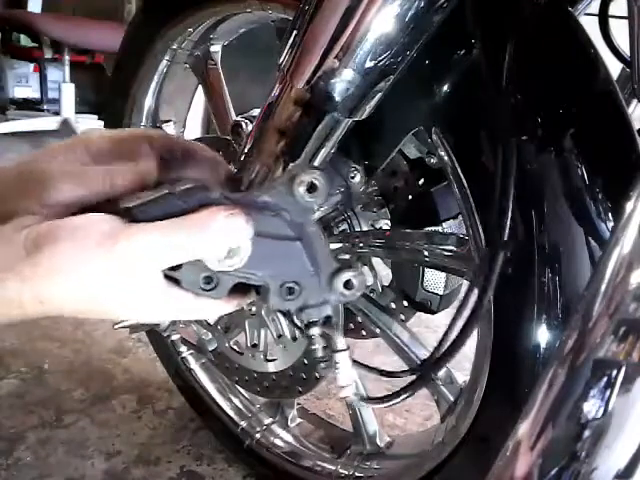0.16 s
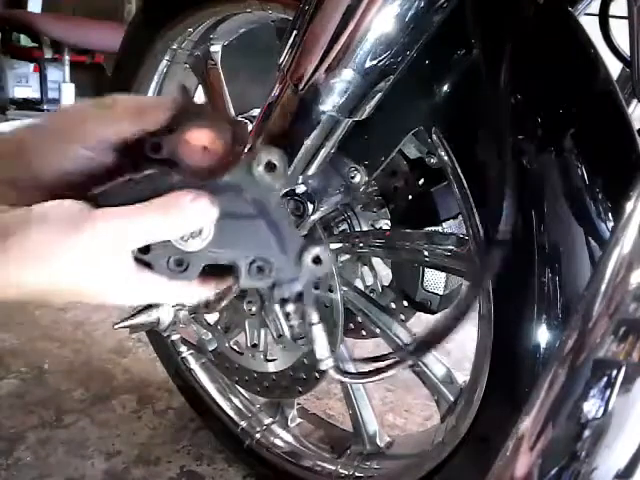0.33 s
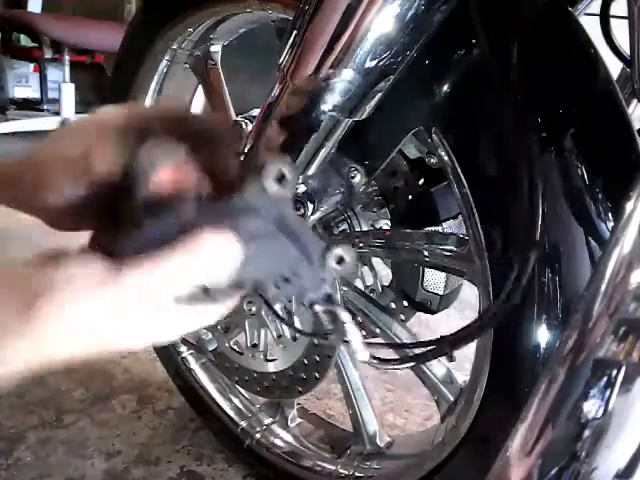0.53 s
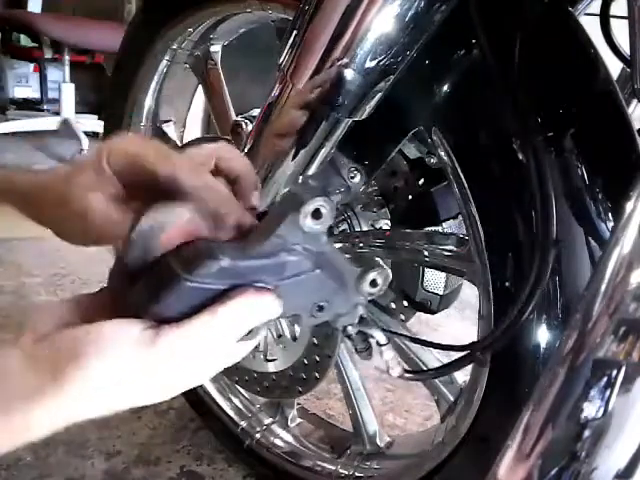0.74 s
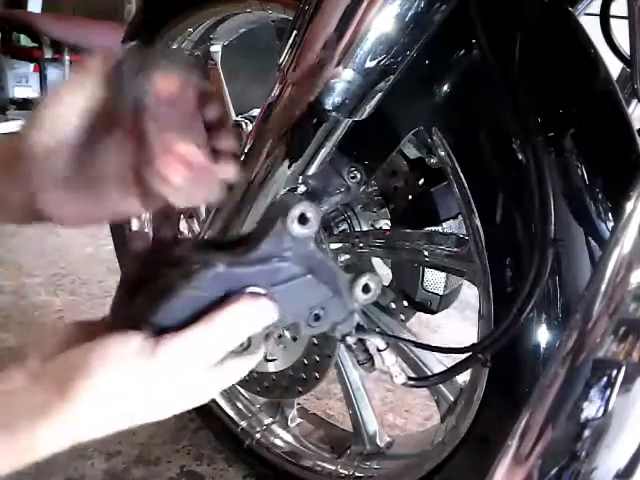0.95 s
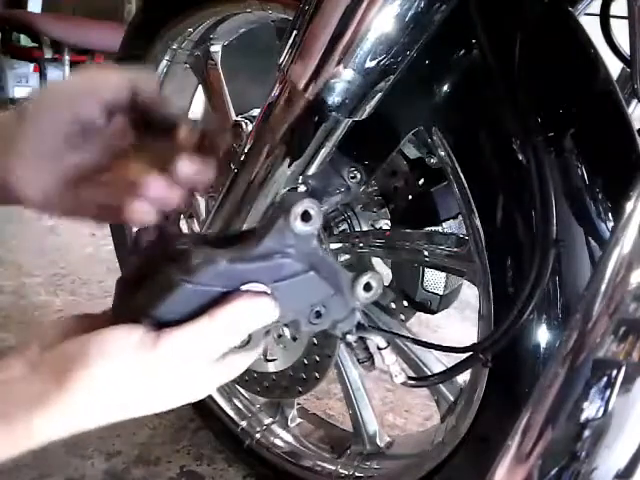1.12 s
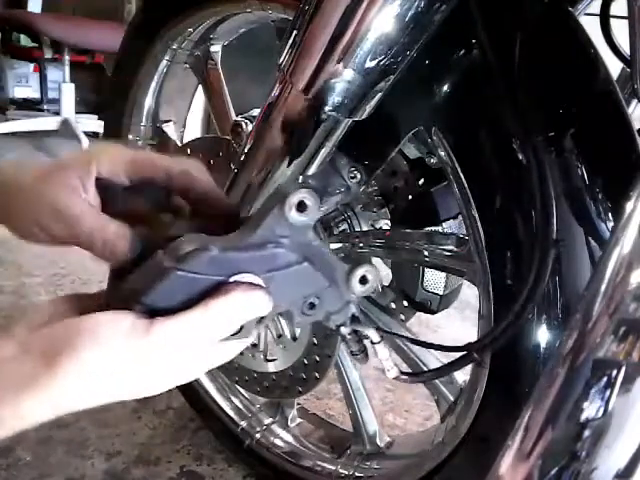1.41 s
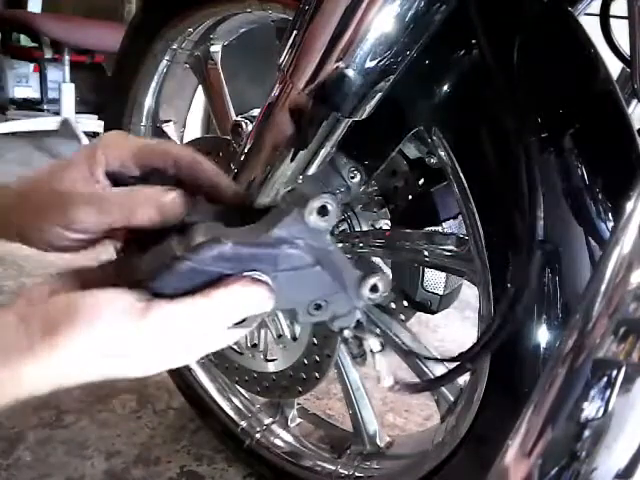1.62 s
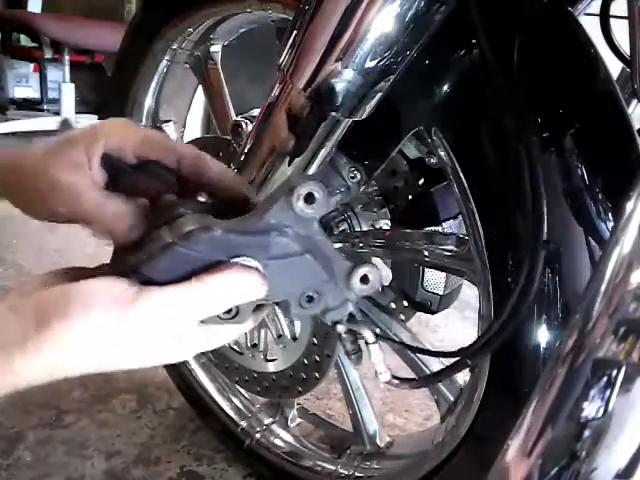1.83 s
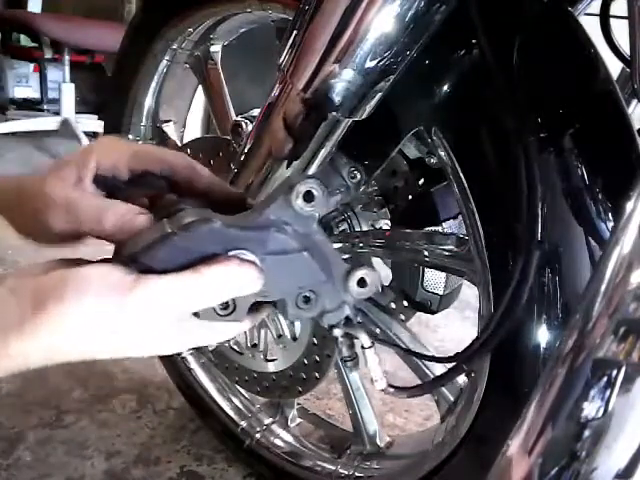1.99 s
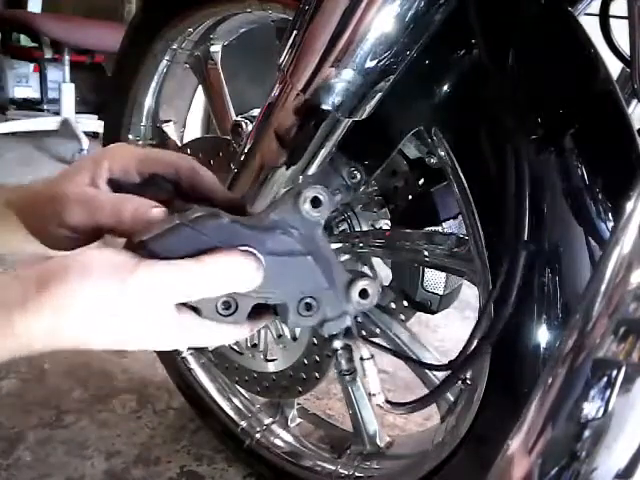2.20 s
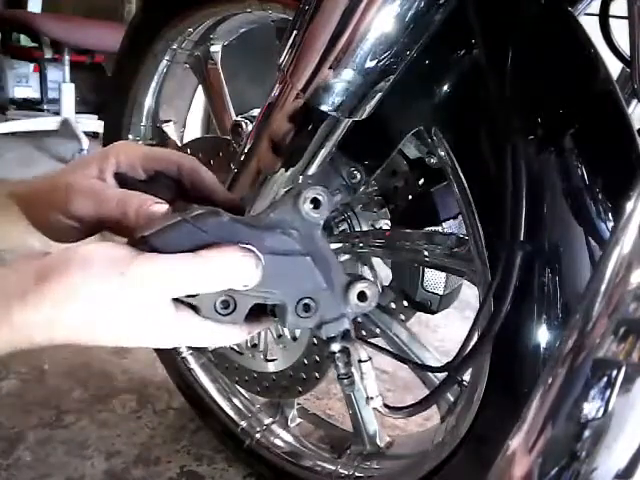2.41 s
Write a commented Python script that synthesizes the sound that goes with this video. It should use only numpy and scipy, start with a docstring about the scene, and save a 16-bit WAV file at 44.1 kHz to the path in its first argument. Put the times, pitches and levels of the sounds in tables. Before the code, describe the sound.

Close up in a garage, hands work brake pads out of a heavy caliper: a hard metallic clack first, ringing clinks within the first second, then quiet rubbing and tiny ticks over low rumble and soft hiss.

```python
"""In a garage, a hand works steel brake pads loose from a cast caliper, an arm's length from a small stereo camera.
The casting clacks and the loose pad rings as decaying modes; the seated pad ticks, with shorter rings, and knocks.
Fingers slip, driving single modes, and scrape as grainy band noise. The garage answers with decaying noise echoes
over a steady rumble with hiss and a few wavering hum tones."""
import sys
import numpy as np
from scipy import signal
from scipy.fft import rfft, irfft, next_fast_len
from scipy.io import wavfile
from scipy.ndimage import uniform_filter1d

SR = 44100
rng = np.random.default_rng(int(sys.argv[2]) if len(sys.argv) > 2 else 0)


def wrap_up_sound(samples):
    """Save the sound to the file named by the first command line argument, as 16-bit audio."""
    columns = np.atleast_2d(samples).T
    # keep every value between -1 and 1, then stretch to whole-number steps
    tamed = np.clip(columns, -1, 1)
    steps = np.round(tamed * 32767).astype(np.int16)
    wavfile.write(sys.argv[1], SR, steps)


def boost_factor(decibels):
    """Convert a level in decibels to a linear amplitude factor."""
    exponent = np.asarray(decibels, float) / 20
    return 10 ** exponent


N = 112454

# Metal against the casting. Each row: start in seconds, ring level in dB before tilt and mode levels,
# crack level in dB before its envelope, crack tilt in dB per octave, crack upper corner in hertz, crack t60 in seconds.
CLACK_EVENTS = [(0.198, -46, -38, -2, 6030, 0.096), (0.2071, -29, -13.5, 0, 9100, 0.034),
                (.208, -5, -15.5, 2.5, 14000, 0.0082), (0.211, -11.5, -13, 4, 15500, 0.035),
                (0.215, -16.5, -25, 0, 14100, 0.023), (.219, -18.5, -29, 0.5, 10000, 0.043),
                (0.2228, -23, -26.5, -0.5, 14850, 0.17), (0.2399, -14, -26.5, -3, 9000, .025),
                (0.253, -35, -41, -8, 8030, 0.076), (0.4366, -44, -33.5, -2.5, 8500, 0.02),
                (0.4443, -24.5, -33, -4.5, 5000, 0.011), (0.489, -44, -23.5, 0.5, 8360, 0.017),
                (0.4988, -52, -30, 0, 7100, 0.013), (.505, -51, -31, 6, 7000, 0.032),
                (0.53, -40, -26, -3.5, 9000, 0.012), (.536, -49, -20.5, -2.5, 9500, 0.018),
                (.546, -45, -38, -8.5, 9000, 0.042), (.553, -57, -32, -4.5, 12300, 0.077),
                (.602, -47, -40.5, 3, 6000, 0.019), (0.679, -49, -32.5, -0.5, 5750, 0.016),
                (0.6827, -35, -32.5, -0.5, 8900, 0.068), (0.797, -32, -33.5, -2, 12000, 0.032),
                (.802, -28, -38.5, -8.5, 12800, 0.024), (.898, -56, -38.5, -1.5, 9000, 0.032),
                (0.905, -39, -50, 4, 15090, 0.013), (1.679, -66, -56, -10, 2976, 0.022),
                (2.2215, -49, -64, 0, 6480, 0.022), (2.274, -55, -55.5, -3, 6460, 0.022)]
CONTACT_S = 0.00025  # time constant of the rise at a contact
SCATTER_DB = 2.5  # largest random change of a mode's level, either way
LEFT_RIGHT = np.array([[1], [-1]])  # signs with which a side signal enters the two ports


def along_hz(table, n):
    """Interpolation on a logarithmic frequency axis: a (Hz, value) table read at the bins of an n-point spectrum."""
    hz, values = np.array(table, float).T[:2]
    return np.interp(np.log(np.fft.rfftfreq(n, 1 / SR) + 1), np.log(hz), values)


def colour(x, gain):
    """Linear filtering as a product of spectra: one gain per bin."""
    return irfft(rfft(x) * gain, x.shape[-1])


def unit(x):
    """Normalization to unit root mean square."""
    return x / np.sqrt(np.mean(x ** 2))


def decay(t, t60):
    """Exponential damping: the level falls by 60 dB in t60 seconds."""
    return np.exp(-np.log(1000) * t / t60)


def flutter(db, count, size):
    """Amplitude modulation by smoothed noise: a random gain of db rms, averaged twice over size samples."""
    noise = uniform_filter1d(rng.standard_normal(count), size=size)
    return boost_factor(db * unit(uniform_filter1d(noise, size=size)))


def strike(times, db, hz, t60, scatter_db=0., rattle_db=0.):
    """Impulse excitation of one damped mode: each blow has its own level and ring time."""
    size = 12288
    rattle_onset_s = .02
    db = db + scatter_db * (2 * rng.random(len(times)) - 1)
    out = np.zeros(N + size)
    for start, gain, ring in zip(times, boost_factor(db), np.broadcast_to(t60, len(times))):
        i = int(start * SR) + 1
        t = (np.arange(size) + i) / SR - start  # keeps the timing between samples
        if rattle_db:
            # the flutter grows after the blow
            gain = gain * flutter(rattle_db, count=size, size=220) ** -np.expm1(-t / rattle_onset_s)
        rise = -np.expm1(-t / CONTACT_S)
        out[i:i + size] += gain * np.sin(2 * np.pi * hz * t) * decay(t, ring) * rise
    return out[:N]


def casting_ring():
    """Modal superposition: each clack rings the heavily damped modes of the casting."""
    # Mode frequencies of the casting in hertz.
    mode_hz = [650, 920, 1340, 1445, 1562, 1866, 2294, 2705, 3390, 3560, 4240, 4650, 6070, 7450]
    # Dull modes in the same order. Each row: level in dB before the common cut, t60 in seconds.
    mode_decays = [(-31, 0.04), (-12, 0.04), (-16.5, 0.023), (-2.5, 0.044), (3, 0.034), (-3, 0.045),
                   (-8, 0.034), (-11.5, 0.033), (-10.5, 0.027), (1.5, 0.038), (-11, 0.059), (-13, 0.032),
                   (-14, 0.07), (-18, 0.03)]
    common_db = -9.5
    tilt_share = .5  # share of the crack's tilt that also tilts the ring
    rows = np.array(CLACK_EVENTS)
    out = np.zeros(N)
    for k, (hz, (mode_db, t60)) in enumerate(zip(mode_hz, mode_decays)):
        tilt_db = tilt_share * rows[:, 3] * np.log2(hz / 1500)
        level_db = rows[:, 1] + mode_db + common_db + tilt_db
        out += (-1) ** k * strike(rows[:, 0], level_db, hz, t60, SCATTER_DB)  # signs alternate
    return out


def casting_crack():
    """Broadband contact noise: a scatter of tiny contacts makes each crack; returns mid and side."""
    # Spectrum of a crack. Each row: frequency in hertz, relative level in dB per hertz.
    crack_shape = [(200, -34), (400, -23.5), (660, -24.5), (950, -15.5), (1200, -16.5), (1600, -8.5),
                   (2360, -7.5), (3510, -5), (6050, -14.5), (10500, -31.5), (12500, -32.5), (14700, -31),
                   (15600, -38)]
    size = 8192
    grain_db = 3
    side_db = -9  # part of a crack that differs between the ports
    out = np.zeros((2, N))
    t = np.arange(size) / SR
    hz = np.fft.rfftfreq(size, 1 / SR)
    shape_db = along_hz(crack_shape, size)
    octaves = along_hz([(250, -4), (16000, 2)], size)  # octaves from 4 kHz
    rise = -np.expm1(-t / CONTACT_S)
    for start, _, db, tilt_db, top_hz, t60 in CLACK_EVENTS:
        grain = flutter(grain_db, count=size, size=40)
        spectrum = boost_factor(shape_db + tilt_db * octaves) / (1 + (hz / top_hz) ** 10)
        burst = unit(colour(grain * rng.standard_normal((2, size)), spectrum))
        burst = boost_factor([[db], [db + side_db]]) * burst * decay(t, t60) * rise
        i = int(start * SR)
        out[:, i:i + size] += burst[:, :N - i]
    return out


def ring_pad(modes, hits):
    """Modal excitation by position: the place of a blow sets each mode's level; the grip scales ring times."""
    rows = np.array(hits)
    times, grip = rows[:, 0], rows[:, -1]
    out = np.zeros(N)
    for k, (hz, t60, partner_hz, partner_db, partner_t60) in enumerate(modes):
        db = rows[:, k + 1]
        # a pad shaking in the grip makes each strong mode flutter as it fades
        out += strike(times, db, hz, t60 * grip, rattle_db=6)
        out -= strike(times, db + partner_db, partner_hz, partner_t60 * grip, SCATTER_DB)
    return out


def loose_pad():
    """Lightly damped free plate: four strong modes with partners, and top modes that follow the fourth."""
    # Each row: strong mode in hertz, its t60 in seconds free of the grip, partner in hertz,
    # partner level in dB against the strong mode before scatter, partner t60 in seconds free of the grip.
    loose_modes = [(2345, 0.13, 2200, -3, 0.041), (3218, 0.11, 3620, 0.5, 0.032),
                   (5958, 0.13, 6800, -17, .03), (7500, 0.083, 8080, -4, 0.035)]
    # Highest modes. Each row: frequency in hertz, level in dB against the fourth mode before scatter,
    # t60 in seconds free of the grip.
    top_modes = [(8850, -11, .05), (9880, -12, .055), (11520, -17, .06), (14500, -16, .055)]
    # Blows. Each row: start in seconds, level in dB of each of the four strong modes,
    # ring time as a ratio to that of the free pad (the grip of the hand).
    loose_hits = [(.4365, -51, -66, -52.5, -55.5, 1.4), (0.4889, -50, -39, -36.5, -53, 1.3),
                  (0.4939, -32, -39, -54, -58, 0.59), (.5003, -37.5, -32, -37, -62, 0.78),
                  (.505, -53, -35.5, -31, -54, 0.67), (.531, -31, -27.5, -28.5, -41, 1.03),
                  (.536, -38.5, -26.5, -27.5, -49, 0.59), (.546, -34.5, -26.5, -47, -39.5, 1),
                  (.553, -30.5, -40, -45, -35.5, 0.7), (0.603, -58, -47, -63, -74.5, 1.4),
                  (0.679, -43.5, -37.5, -52, -50, 0.89), (0.6832, -35, -20.5, -24.5, -38, 0.37),
                  (0.7976, -27, -48, -38, -41.5, 0.41), (.802, -43, -28.5, -65, -49.5, 0.63),
                  (.898, -59, -59, -57.5, -56.5, 1.2), (.9038, -35, -37, -60, -52.5, 0.64)]
    rows = np.array(loose_hits)
    out = ring_pad(loose_modes, loose_hits)
    for hz, db, t60 in top_modes:
        out += strike(rows[:, 0], rows[:, 4] + db, hz, t60 * rows[:, -1], scatter_db=7)
    return out


def seated_pad():
    """Boundary damping: the pad still in its seat ticks with modes that die sooner."""
    # Each row: strong mode in hertz, its t60 in seconds before the ring ratio, partner in hertz,
    # partner level in dB against the strong mode before scatter, partner t60 in seconds before the ring ratio.
    seated_modes = [(2150, 0.07, 3040, -10, 0.035), (2057, 0.034, 1805, -2, 0.054),
                    (4480, 0.075, 5620, -2, 0.031), (5070, 0.09, 3650, -3, 0.05)]
    # Blows. Each row: start in seconds, level in dB of each of the four strong modes,
    # ring time as a ratio to the t60 above.
    seated_hits = [(.437, -35, -55, -58, -64, 0.54), (.4452, -24.5, -27, -58, -70, 0.65),
                   (.4915, -24.5, -39, -35.5, -48, 0.77), (.536, -19.5, -31, -27, -25, 0.56),
                   (.546, -45, -54.5, -53, -56, 0.6), (.7786, -50.5, -52, -68, -65, 2.4),
                   (.7972, -38, -24.5, -58, -55, 0.82), (.802, -24, -24, -68, -30.5, 0.67),
                   (.9038, -50, -43, -45, -56, 0.63), (2.2222, -46, -47.5, -47.5, -79, 0.67),
                   (2.228, -68, -62, -54, -76.5, 0.92), (2.2745, -46.5, -44.5, -47, -63.5, 0.41),
                   (2.5456, -41.5, -50, -47, -70, 0.9)]
    return ring_pad(seated_modes, seated_hits)


def seat_knock():
    """Strongly damped impact: one soft knock of the pad against its seat wakes five short modes."""
    # Each row: frequency in hertz, level in dB against the knock, t60 in seconds.
    knock_modes = [(1050, 1, .02), (1725, 0, .03), (2840, -4, .018), (3420, -10, .02), (5200, -17, .012)]
    start_s, knock_db = 2.0133, -49
    return sum(strike(np.array([start_s]), np.array([knock_db + db]), hz, t60) for hz, db, t60 in knock_modes)


def resonate(x, hz, t60):
    """Driven resonance: a one-pole complex filter is one damped mode pushed by x."""
    pole = np.exp(2j * np.pi * hz / SR - np.log(1000) / (t60 * SR))
    return signal.lfilter([1], [1, -pole], x).imag


def swell(start, length):
    """Smooth gating by a squared sine: one rise and fall."""
    return np.sin(np.pi * np.clip((np.arange(N) / SR - start) / length, 0, 1)) ** 2


def finger_slips():
    """Resonant driving by friction: fingers slip on a pad and push one mode in step, partly at random."""
    # Each row: start in seconds, length of the push in seconds, mode in hertz, drive level in dB.
    slip_events = [(.13, .035, 4470, -66), (.193, .016, 1700, -36), (.645, .025, 5930, -47),
                   (.72, .02, 2340, -56), (1.0, .025, 7515, -64), (1.033, .055, 2340, -63),
                   (1.045, .03, 5930, -62), (1.122, .05, 2340, -62), (1.236, .012, 2340, -61)]
    t60_s = .1
    roughness = .6  # rms of the random part of the push
    t = np.arange(N) / SR
    jitter = 1 + roughness * unit(uniform_filter1d(rng.standard_normal(N), size=250))
    out = np.zeros(N)
    for start, length, hz, db in slip_events:
        push = swell(start, length) * np.exp(2j * np.pi * hz * t)
        drive = push * jitter / np.abs(push).sum() * 2
        out += boost_factor(db) * resonate(drive, hz, t60_s)
    return out


def scrapes():
    """Friction noise: skin and pad drag over the casting as grainy noise in a band."""
    # Each row: start in seconds, length in seconds, band centre in hertz, noise level in dB before the swell.
    scrape_events = [(0.169, 0.033, 3080, -48), (1.051, 0.21, 3000, -72.5), (1.482, 0.17, 2300, -68.5),
                     (1.574, 0.1, 3490, -63), (1.635, 0.11, 3000, -68.5), (1.79, 0.056, 3760, -70),
                     (1.5, .5, 2800, -68), (1.81, .14, 3400, -64), (2.0, 0.09, 3300, -65),
                     (2.096, 0.27, 2500, -75), (2.485, 0.081, 3500, -68.5)]
    width_oct, grain_db = 0.42, 4.5
    bins = np.fft.rfftfreq(N, 1 / SR) + 1
    grain = boost_factor(grain_db * unit(uniform_filter1d(rng.standard_normal(N), size=150)))
    out = np.zeros(N)
    for start, length, hz, db in scrape_events:
        band = np.exp(-.5 * (np.log2(bins / hz) / width_oct) ** 2)
        noise = unit(colour(rng.standard_normal(N) * grain, band))
        out += boost_factor(db) * swell(start, length) * noise
    return out


def garage(x):
    """Diffuse reverberation: convolution with noise tails, independent at each port, each band with its t60."""
    # Each row: band centre in hertz, t60 in seconds.
    band_decays = [(500, 0.42), (2000, 0.25), (6000, 0.27), (14000, 0.33)]
    size = 16384
    room_db, gap_s = -13, 0.0042  # gap before the first echo
    t = np.arange(size) / SR - gap_s
    hz = np.fft.rfftfreq(size, 1 / SR) + 1
    tails = np.zeros((2, size))
    for centre_hz, t60 in band_decays:
        band = np.exp(-.5 * (np.log2(hz / centre_hz) / 0.94) ** 2)
        noise = colour(rng.standard_normal((2, size)), band)
        tails += noise * decay(t, t60) * (t > 0)
    tails = tails / np.sqrt(np.sum(tails ** 2) / 2)  # mean energy of 1 per port
    return boost_factor(room_db) * signal.fftconvolve(x[None], tails, axes=1)[:, :N]


def air():
    """Spatial coherence of ambient noise: rumble and hiss, alike at both ports in the bass."""
    # Each row: frequency in hertz, relative level in dB per hertz.
    air_shape = [(20, -48.5), (31, -28), (40, -6.5), (50, -23), (62, -4), (113, -3), (150, -7.5),
                 (227, -11.5), (368, -17), (522, -22), (1200, -26), (2500, -33), (3500, -39), (4500, -43),
                 (7000, -48), (15500, -51)]
    # Each row: frequency in hertz, side minus mid level in dB.
    air_spread = [(60, -24.5), (110, -18), (200, -12), (380, -6.5), (700, -2.5), (1290, 0), (2380, 1),
                  (4400, -0.5), (8120, -0.5), (15000, -1)]
    shape = boost_factor(along_hz(air_shape, N))
    mid = colour(rng.standard_normal(N), shape)
    side = colour(rng.standard_normal(N), shape * boost_factor(along_hz(air_spread, N)))
    return boost_factor(-50.5) * (mid + side * LEFT_RIGHT) / mid.std()


def hum():
    """Narrow-band noise: each tone wavers because its spectrum has a width."""
    # Each row: frequency in hertz, width at half amplitude in hertz, rms level in dB.
    hum_tones = [(73.3, 24, -56.5), (112.46, 3.8, -54.5), (193.2, 4.5, -67), (287, 9, -66.5),
                 (364, 3.5, -72)]
    bins = np.fft.rfftfreq(N, 1 / SR)
    out = np.zeros(N)
    for hz, width, db in hum_tones:
        peak = 1 / (1 + (2 * (bins - hz) / width) ** 2)
        out += boost_factor(db) * unit(colour(rng.standard_normal(N), peak))
    return out


def at_ports(near, side):
    """Interaural-style differences: level and phase offsets by frequency are split evenly between two ports."""
    # Each row: frequency in hertz, phase in radians by which the left leads.
    port_phase = [(300, 0), (1500, 0.73), (2100, 0.5), (3270, 1.16), (4050, 1.38), (4900, 2), (5940, 1.45),
                  (7500, 0.94), (9000, 1.43), (12000, 2.5), (15200, 1.5)]
    # Each row: frequency in hertz, left minus right level in dB.
    port_level = [(200, -2.5), (600, 0), (1290, 2), (2380, -4), (4400, 2), (8120, -0.5)]
    size = next_fast_len(N + 4096)
    half = boost_factor(along_hz(port_level, size) / 2) * np.exp(.5j * along_hz(port_phase, size))
    spectra = rfft(near + side * LEFT_RIGHT, size)
    return irfft(spectra * np.array([half, 1 / half]), size)[:, :N]


def scene():
    """Linear superposition: direct sound at two ports, reverberation of its mid part, and ambient noise."""
    crack, side = casting_crack()
    clack = casting_ring() + crack
    near = clack + loose_pad() + seated_pad() + seat_knock() + finger_slips() + scrapes()
    return at_ports(near, side) + garage(near) + air() + hum()


def roll_off(x):
    """The treble ends steeply here."""
    return signal.sosfilt(signal.butter(12, 15640, fs=SR, output="sos"), x)


def record(dry):
    """Band limiting: an elliptic low-pass cuts the camera's top."""
    low_pass = signal.ellip(8, .2, 60, 15650, fs=SR, output="sos")  # order, ripple dB, stop dB, edge Hz
    mix = signal.sosfilt(low_pass, dry)
    return roll_off(mix)


dry = scene()
out = record(dry)
wrap_up_sound(out)
```